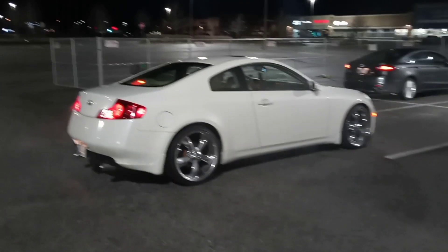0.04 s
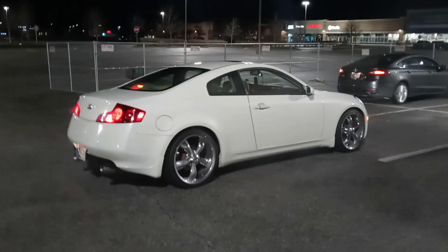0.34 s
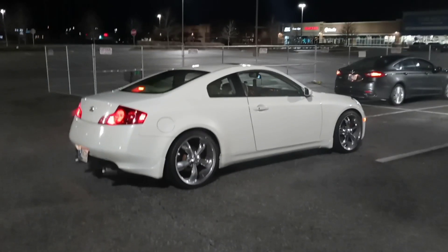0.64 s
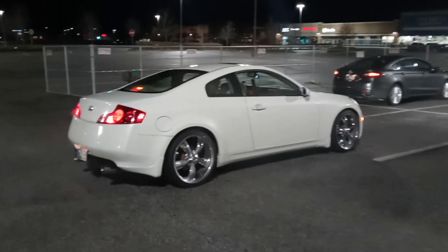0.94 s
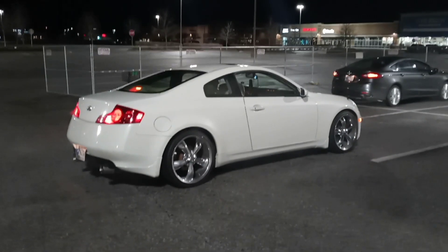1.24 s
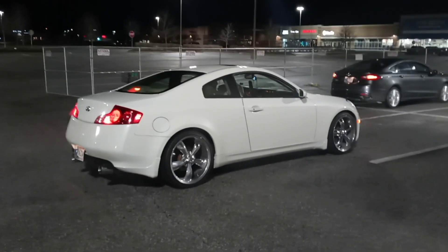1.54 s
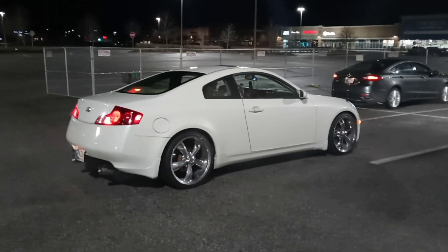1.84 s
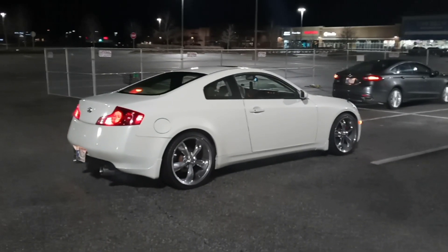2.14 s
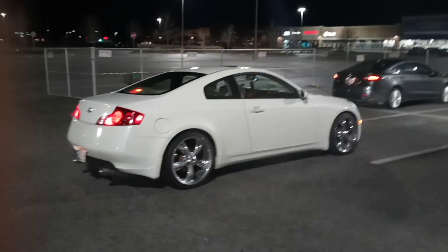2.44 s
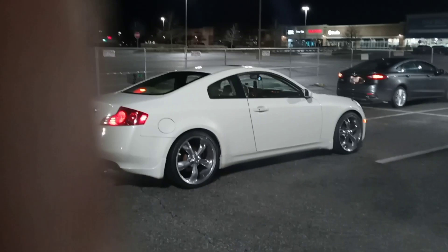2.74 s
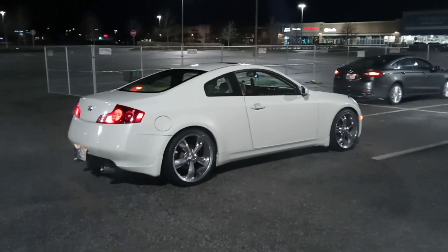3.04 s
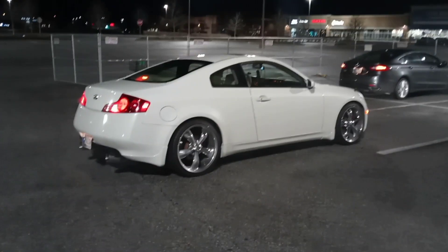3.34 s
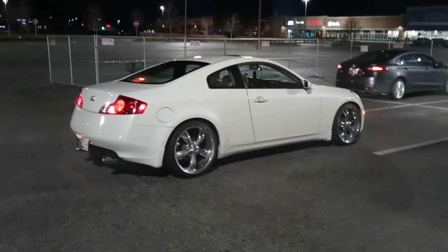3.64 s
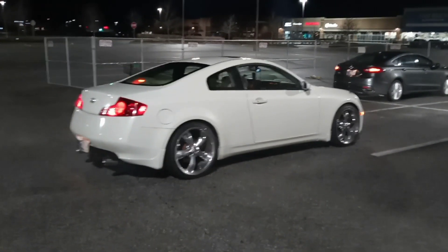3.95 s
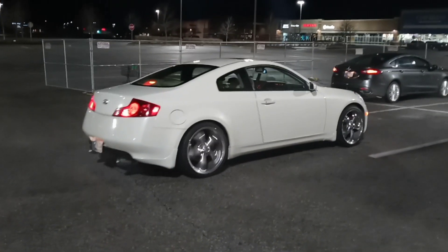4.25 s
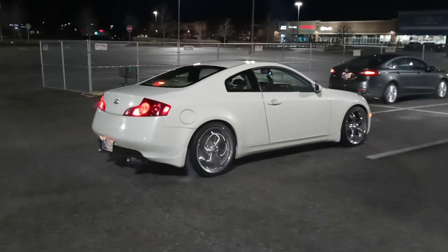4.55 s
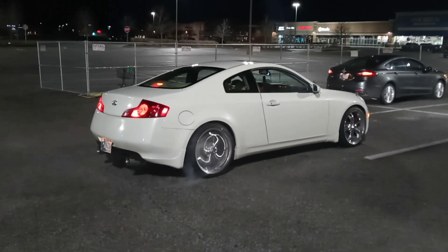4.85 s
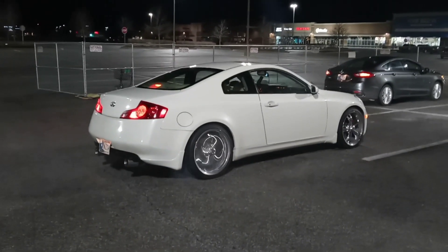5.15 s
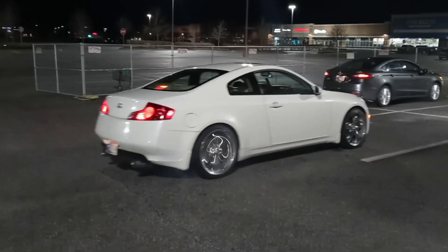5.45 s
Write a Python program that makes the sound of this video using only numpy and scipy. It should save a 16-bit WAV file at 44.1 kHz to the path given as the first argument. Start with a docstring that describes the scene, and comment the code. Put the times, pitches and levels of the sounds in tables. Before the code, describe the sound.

A car engine revs once, settles to a lumpy idle, then revs hard as a rear tyre spins and squeals on asphalt.

```python
"""An open car park, a six-cylinder coupe nearby, one phone microphone. The engine is blipped: the exhaust
booms, rasps and cracks while air hisses past the throttle and a cooling fan hums. The throttle shuts and
the revs run down, settling just after 2 s into a lumpy idle of uneven thumps. At 4 s the engine revs hard,
spitting gas, and from 4.3 s to the end a rear tyre spins on the asphalt, its tread sticking and slipping
in squeals and yelps as the rubber scrubs over grit."""
import sys
import numpy as np
from scipy import signal
from scipy.fft import rfft, irfft, next_fast_len
from scipy.io import wavfile
from scipy.ndimage import map_coordinates

SR = 44100
rng = np.random.default_rng(int(sys.argv[2]) if len(sys.argv) > 2 else 0)


def pcm_store(signal):
    """Save signal as 16-bit PCM."""
    levels = np.round(np.clip(np.atleast_2d(signal), -1, 1) * 32767)
    wavfile.write(sys.argv[1], SR, levels.astype(np.int16).T)


N = 246078
TIME = np.arange(N) / SR
SHUT_S, FUEL_CUT_S, OPEN_S = 0.35, 0.86, 3.99  # throttle shuts, fuel is cut, throttle opens again
REF_SPEED = 60  # crank turns a second


def amp(db):
    """Decibels to gain."""
    return 10 ** (np.asarray(db) / 20)


def unit(x):
    """Scale to rms 1."""
    return x / np.sqrt(np.mean(x ** 2) + 1e-20)


def curves(rows):
    """One value per sample for each column after the time."""
    times, *columns = np.transpose(rows)
    return [np.interp(TIME, times, column) for column in columns]


def stages(rows, glide_s=0.043):
    """Like curves, but each value holds, with a short glide centred on the next row's time."""
    times, *columns = np.transpose(rows)
    ramps = [np.clip((TIME - at) / glide_s + .5, 0, 1) for at in times[1:]]
    return [column[0] + sum(step * ramp for step, ramp in zip(np.diff(column), ramps))
            for column in columns]


def during(rows, fade_s=0.022):
    """1 over the span of a table, fading out beyond it."""
    return np.clip(np.minimum(TIME - rows[0][0], rows[-1][0] - TIME) / fade_s + 1, 0, 1)


def wobble(rate):
    """A smooth random curve, rate knots a second."""
    return map_coordinates(rng.standard_normal(int(N * rate / SR) + 4), [TIME * rate])


def response(colour, size=16384):
    """Frequencies and causal complex gain of a colour (frequency [Hz], level [dB])."""
    hz = np.fft.rfftfreq(size, 1 / SR)
    knot_hz, knot_db = np.transpose(colour)
    gain = amp(np.interp(np.log(hz + 1), np.log(knot_hz), knot_db))
    cepstrum = irfft(np.log(gain))
    cepstrum[1:size // 2] *= 2
    cepstrum[size // 2 + 1:] = 0
    return hz, np.exp(rfft(cepstrum))


def coloured(x, colour):
    """x through a causal colour, at rms 1."""
    return unit(signal.fftconvolve(x, irfft(response(colour)[1]))[:N])


def noise(colour):
    """Coloured noise of rms 1."""
    return coloured(rng.standard_normal(N), colour)


def pulses(cycles, scatter, mean=1):
    """One impulse of bounded random size per cycle, at equal power whatever the rate."""
    at = np.flatnonzero(np.diff(np.floor(cycles)) > 0)
    sizes = mean + scatter * np.sqrt(3) * rng.uniform(-0.97, 1, len(at))
    train = np.zeros(N)
    train[at] = sizes * np.sqrt(np.gradient(at))
    return train


def puffs(turns, depth_db):
    """Gas flow that swells once a crank turn."""
    return unit(amp(depth_db * np.cos(2 * np.pi * (turns - .15))))


# The crankshaft through blip, idle and launch: (time [s], speed [turns/s])
BLIP_SPEED = [(0, 44.7), (0.21, 77.4), (0.34, 82.9), (0.52, 82.0), (0.78, 77.0), (0.9, 72.5), (1.4, 53.4),
              (2.18, 25.0)]
IDLE_SPEED = [(2.55, 21.7), (2.87, 17.7), (3.5, 20.1), (3.92, 20.1)]
LAUNCH_SPEED = [(4.02, 25.4), (4.2, 44.1), (4.34, 54.1), (4.57, 60.5), (4.74, 67.0), (4.94, 70.0),
                (5.28, 67.6), (5.58, 69.4)]
def crankshaft():
    """Turns made so far and turns a second: the pace of the engine's sounds."""
    speed, = curves(BLIP_SPEED + IDLE_SPEED + LAUNCH_SPEED)
    return np.cumsum(speed) / SR, speed


# The exhaust pipe, setting the boom's phase and the burble's colour: (frequency [Hz], level [dB])
PIPE = [(25, -31.5), (48, -27.5), (68, 1), (110, -5), (170, 6.5), (215, -5.5), (290, -0.5), (350, -15.5),
        (420, -19), (560, -15.5), (750, -36), (1200, -48), (3000, -54)]
# Resonances and notches that the low orders sweep through: (frequency [Hz], gain [dB])
PIPE_RESONANCES = [(30, -17), (48, -16.5), (68, 7.5), (85, 8), (120, 3.5), (145, 2), (170, 1), (205, -4.5),
                   (232, -10), (280, 3), (318, 0), (350, -9), (415, -17), (490, -6.5)]
# Exhaust orders 1 to 8: (on throttle [dB], throttle shut [dB], fuel cut [dB], added at low speed [dB])
ORDERS = [(-12, -1.5, 2, -2), (-1.5, -10, -3, 4), (9, 4.5, 8.5, -9), (0, -4, -7, 1.5), (-.5, -16, -4.5, 10),
          (1, -7.5, -6.5, -2), (-19, -19, -9.5, 5), (-21, -18, -14, 8.5)]
# Strength of the exhaust pulses: (time [s], relative level [dB])
BLIP_DRIVE = [(0, -23), (0.3, -17), (0.62, -22.0), (0.9, -21.5), (1.35, -20.0), (1.75, -26.0), (2, -26.5),
              (2.16, -30.5)]
LAUNCH_DRIVE = [(3.98, -25.5), (4.12, -22.5), (4.6, -21.5), (5.58, -21.0)]
def boom(turns, speed, flutter_db=0.83, smear_rad=0.223, smooth_speed=55.6, lumpy_speed=32.5):
    """At the tailpipe, the low orders: clean lines that swell as they cross the pipe's resonances."""
    hz, pipe = response(PIPE)
    pipe_phase = np.unwrap(np.angle(pipe))
    resonance_hz, resonance_db = np.transpose(PIPE_RESONANCES)
    # the pulses pair up unevenly as the crank slows
    lumpy = np.clip((smooth_speed - speed) / (smooth_speed - lumpy_speed), 0, 1)
    out = np.zeros(N)
    for order, (pulling, shut, cut, slow) in enumerate(ORDERS, 1):
        order_hz = order * speed
        db, = stages([(0, pulling), (SHUT_S, shut), (FUEL_CUT_S, cut), (OPEN_S, pulling)])
        db = db + lumpy * slow + np.interp(np.log(order_hz), np.log(resonance_hz), resonance_db)
        # higher orders leave the silencer later, which blunts each pulse
        phase = np.interp(order_hz, hz, pipe_phase) - smear_rad * order ** 2
        out -= amp(db + flutter_db * wobble(25)) * np.cos(2 * np.pi * order * turns + phase)
    drive_db, = curves(BLIP_DRIVE + LAUNCH_DRIVE)
    return np.sqrt(2) * out * amp(drive_db) * (during(BLIP_DRIVE) + during(LAUNCH_DRIVE))


# The silencer's effect on the upper orders: (frequency [Hz], gain [dB])
SILENCER = [(30, -51), (70, -29), (200, 19.5), (290, 13.5), (350, 0.5), (430, -14), (485, -6.5), (550, 3),
            (620, 1.5), (700, -2.5), (810, -4.5), (920, -22.5), (1050, -14), (1400, -39.5), (2200, -39)]
def bark(turns, speed, weak_gain=0.38, spacing_turns=.45, rough_db=2.5, jitter_turns=0.0025):
    """The steep edges of a strong and a weaker pulse each turn: upper orders shaped by the silencer."""
    hz, silencer = response(SILENCER)
    angle = 2 * np.pi * (turns + jitter_turns * wobble(60))
    weak = weak_gain * amp(rough_db * wobble(50))
    out = np.zeros(N)
    for order in range(7, 26):
        pulse_pair = 1 + weak * np.exp(-2j * np.pi * order * spacing_turns)
        gain = np.interp(order * speed, hz, silencer) * pulse_pair
        out -= np.real(gain * np.exp(1j * order * angle))
    # wider-spaced orders each carry more of the power
    return amp(-8.5) * out * np.sqrt(speed / speed.mean()) * amp(rough_db * wobble(70))


# Blip, easing off, throttle shut, misfiring, running down, settling, idling, picking up, pulling against
# the brakes, wheel spinning. Relative levels, the last three at REF_SPEED:
# (start [s], burble [dB], bark [dB], turbulence [dB], hiss [dB])
ENGINE_STAGES = [(0, -20.5, -19.5, -30, -44), (0.3, -21, -23.5, -28.5, -37.5),
                 (SHUT_S, -26, -39.5, -32.5, -36), (0.58, -17.5, -36.5, -33.5, -35.5),
                 (FUEL_CUT_S, -22, -31.5, -30.5, -34.5), (1.42, -26.5, -34.5, -32.5, -37),
                 (2, -34, -54, -31, -35), (OPEN_S, -21, -26, -24, -32), (4, -24.5, -18.5, -33, -41),
                 (4.5, -35, -20.5, -27.5, -41.5)]
# Gas rushing from the tailpipe: (frequency [Hz], relative level [dB])
GAS_COLOUR = [(60, -14.5), (300, -7.5), (420, -12), (600, -4), (800, -8), (1050, -10.5), (1400, -18),
              (2000, -24), (4000, -43)]
def exhaust(turns, speed, bark_db_per_octave=8, gas_db_per_octave=7):
    """Boom and bark, the burble of unequal firings, and gas turbulence puffed out once a turn."""
    burble_db, bark_db, gas_db, _ = stages(ENGINE_STAGES)
    octaves = np.log2(speed / REF_SPEED)
    firings = pulses(3 * turns, scatter=1, mean=0)  # six cylinders fire three times a turn
    burble = amp(burble_db) * coloured(firings, PIPE)
    gas = coloured(rng.standard_normal(N) * puffs(turns, depth_db=1), GAS_COLOUR)
    gas *= amp(gas_db + gas_db_per_octave * octaves)
    bark_gain = amp(bark_db + bark_db_per_octave * octaves)
    return boom(turns, speed) + burble + bark_gain * bark(turns, speed) + gas


# Air at the throttle, and the running gear's dull whirr: (frequency [Hz], relative level [dB])
HISS_COLOUR = [(760, -14), (1300, -8), (1440, -17.5), (1810, -0.5), (2080, -5.5), (2660, -3.5), (3380, -7),
               (3830, -6), (6860, -6.5), (8800, -8.5), (11100, -15), (12900, -13.5), (15600, -16)]
WHIRR_COLOUR = [(530, 3), (900, -22), (1010, 3), (1160, -3), (1270, -3.5), (1560, -5.5), (2050, -9.5),
                (2340, -20.5), (2800, -7.5), (3000, -16.5), (8900, -32), (11300, -39), (15600, -33)]
# The cooling fan's hum: (frequency [Hz], level [dB])
FAN_TONES = [(298, -40.5), (362, -52), (544, -51.5), (596, -50)]
def engine_bay(turns, speed, hiss_db_per_octave=10, whirr_db=-41.5, rumble_db=-42):
    """Under the bonnet, air hisses past the throttle, louder with speed, over whirr, fan and rumble."""
    hiss_db = stages(ENGINE_STAGES)[-1] + hiss_db_per_octave * np.log2(speed / REF_SPEED)
    air = amp(hiss_db) * noise(HISS_COLOUR) + amp(whirr_db) * noise(WHIRR_COLOUR)
    air *= amp(0.44 * wobble(40)) * puffs(turns, depth_db=0.67)
    fan = np.sqrt(2) * sum(amp(db + wobble(4.64)) * np.sin(2 * np.pi * hz * TIME + 0.27 * wobble(4.4))
                           for hz, db in FAN_TONES)
    rumble = amp(rumble_db) * noise([(15, -11), (35, -18), (90, 3), (400, -35), (2000, -68)])
    return air + fan + rumble


# Sharp exhaust cracks during the blip: (time [s], level [dB])
CRACKS = [(0.0685, -22), (0.1186, -24), (0.163, -19), (0.204, -24)]
# Small scattered ticks: (time [s], relative level [dB])
TICKS = [(0.4344, -20), (2.2394, -31), (4.615, -13)]
def gas_bursts(turns, spit_count=14, spit_delay_s=.015, spit_fade_db_per_s=38):
    """Short bursts of gas: midrange cracks, bright ticks, and spits just after the throttle reopens."""
    def bursts(rows, decay_s, colour):
        envelope = sum(amp(db) * (TIME >= at) * np.exp(-abs(TIME - at) / decay_s) for at, db in rows)
        return noise(colour) * envelope
    crack_colour = [(300, -10), (800, 2), (1300, -5), (2200, -10), (3200, -32), (9000, -55)]
    spit_colour = [(1000, -3.5), (4500, -4), (8000, -4), (15000, -14)]
    cracks = bursts(CRACKS, decay_s=.002, colour=crack_colour)
    pulse_times = TIME[1:][np.diff(np.floor(2 * turns)) > 0]
    spit_times = pulse_times[pulse_times > OPEN_S + spit_delay_s][:spit_count]
    spits = [(at, -23 - spit_fade_db_per_s * (at - OPEN_S)) for at in spit_times]
    return cracks + amp(-9.5) * bursts(TICKS + spits, decay_s=0.0075, colour=spit_colour)


# The idle's thumps: (time [s], level [dB])
IDLE_LEVEL = [(2.18, -26), (2.38, -31), (2.53, -25), (2.85, -28), (3.35, -22), (3.8, -21.5), (3.9, -27.5),
              (3.96, -14)]
# The exhaust pipe at idle: (frequency [Hz], relative level [dB])
IDLE_PIPE = [(25, -70), (48, -22), (72, 5), (105, 4.5), (170, 1.5), (215, -7.5), (290, -10.5), (380, -40),
             (600, -26), (1500, -62)]
def idle(turns):
    """A lumpy idle at the tailpipe: two unevenly spaced thumps and a faint third in each crank turn."""
    thumps = pulses(turns, scatter=.13)
    thumps += 0.7 * pulses(turns - .44, scatter=.15)
    thumps += 0.13 * pulses(turns - .72, scatter=.4)
    return amp(curves(IDLE_LEVEL)[0]) * during(IDLE_LEVEL) * coloured(thumps, IDLE_PIPE)


# The spinning tyre, in relative levels: (time [s], squeal [dB], scrub [dB])
WHEELSPIN = [(4.33, -44, -47.5), (4.49, -27, -34.5), (4.67, -21.5, -27), (4.77, -25.5, -29),
             (4.86, -21, -27.5), (5.58, -22, -31)]
def spinning_tyre():
    """Down at the asphalt, a rear tyre loses grip, squealing and scrubbing."""
    squeal_db, scrub_db = curves(WHEELSPIN)
    return during(WHEELSPIN) * (amp(squeal_db) * squeal() + amp(scrub_db) * scrub())


def chirps(rows, life_s, glide, overtone_db):
    """Short stick-slip tones, mostly rising, from rows of (time [s], frequency [Hz], level [dB])."""
    half = round(life_s * SR / 2)
    t = np.arange(-half, half) / SR
    out = np.zeros(N + SR)
    for (at, hz, db), rise in zip(rows, glide * rng.normal(1, 1, len(rows))):
        angle = 2 * np.pi * hz * (t + rise * t ** 2 / (2 * life_s))
        tone = np.sin(angle) + amp(overtone_db) * (np.sin(2 * angle) + np.sin(3 * angle) / 2)
        first = round((at + t[0]) * SR)
        out[first:first + len(t)] += amp(db) * np.hanning(len(t)) * tone
    return out[:N]


# Tread modes that stick and slip, and the noise under them: (frequency [Hz], relative level [dB])
TREAD_MODES = [(1050, -2), (1135, 1), (1235, -1.5), (1260, -5), (1335, -7)]
SQUEAL_COLOUR = [(450, -37), (640, -21), (720, -12), (830, 0.5), (930, -5.5), (1060, -1.5), (1250, 1),
                 (1380, -2), (1470, -21), (1900, -36.5)]
def squeal(count=260):
    """Tread blocks catch and let go in a dense run of chirps, over a band of rubbery noise."""
    start, end = WHEELSPIN[0][0], WHEELSPIN[-1][0]
    when, mode, detune, size = rng.random((count, 4)).T
    hz, db = np.array(TREAD_MODES)[(mode * len(TREAD_MODES)).astype(int)].T
    times = start + (end - start) * (np.arange(count) + when) / count
    slips = np.c_[times, hz * (1 + .035 * (detune - .5)), db + 7 * size]
    tones = chirps(slips, life_s=0.069, glide=0.033, overtone_db=-13.0)
    tones /= np.std(tones[TIME > start])
    return amp(-3.5) * tones + amp(-2.5) * noise(SQUEAL_COLOUR) * amp(1.5 * wobble(80))


# Rubber tearing over grit: (frequency [Hz], relative level [dB])
SCRUB_COLOUR = [(850, -28), (1450, -2.5), (1770, -5.5), (2050, -2.5), (2380, -5), (2880, -2), (3120, -4.5),
                (3340, -5), (3690, -8), (5120, -7.5), (8340, -15.5), (9210, -13.5), (10500, -22.5),
                (13000, -26), (15600, -37)]
# Resonances of the tyre and wheel well: (frequency [Hz], width [Hz], relative level [dB])
WHEEL_RINGS = [(1943, 26, 2), (2110, 60, 4), (2584, 78, 4), (2870, 50, 5), (2987, 56, 6), (3365, 140, 2.5),
               (4440, 170, -17), (5400, 110, -15), (5800, 310, -21)]
def scrub(flicker_db=3):
    """Rubber tears over grit and sets tyre and wheel well ringing, each ring flickering on its own."""
    def ring(hz, width):
        return np.real((wobble(width) + 1j * wobble(width)) * np.exp(2j * np.pi * hz * TIME))
    rings = sum(amp(db + flicker_db * wobble(22)) * ring(hz, width) for hz, width, db in WHEEL_RINGS)
    return (amp(0.4) * noise(SCRUB_COLOUR) + amp(-6.0) * unit(rings)) * amp(1.2 * wobble(300))


# Yelps of the tread: (time [s], frequency [Hz], peak level [dB])
YELPS = [(4.49, 1090, -19), (4.612, 760, -11.5), (4.668, 1225, -10.5), (4.722, 1215, -12),
         (4.875, 1190, -17), (5.085, 1050, -15), (5.19, 1140, -9)]
def yelps():
    """Single loud slips of the tread stand out of the squeal."""
    return chirps(YELPS, life_s=0.021, glide=.04, overtone_db=-19)


def scene():
    """The car from one spot, in mono: the crankshaft paces exhaust and hiss, then the tyre joins in."""
    turns, speed = crankshaft()
    engine = exhaust(turns, speed) + idle(turns) + gas_bursts(turns) + engine_bay(turns, speed)
    return (engine + spinning_tyre() + yelps())[None]


def record(dry):
    """The phone's microphone rounds off the highest peaks and keeps nothing above its band limit."""
    top_hz = 15750
    rounded = dry / (1 + abs(dry) ** 8) ** (1 / 8)
    size = next_fast_len(N + SR // 2)
    in_band = np.fft.rfftfreq(size, 1 / SR) < top_hz
    return irfft(rfft(rounded, size) * in_band, size)[:, :N]


dry = scene()
out = record(dry)
pcm_store(out)
```